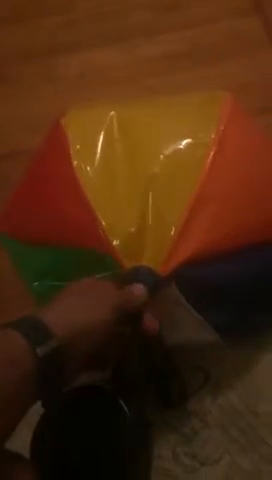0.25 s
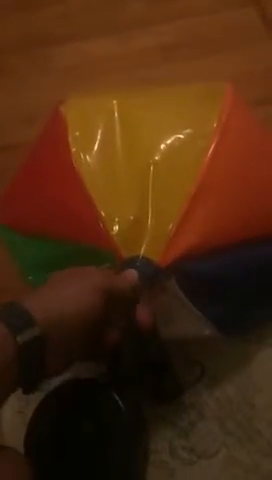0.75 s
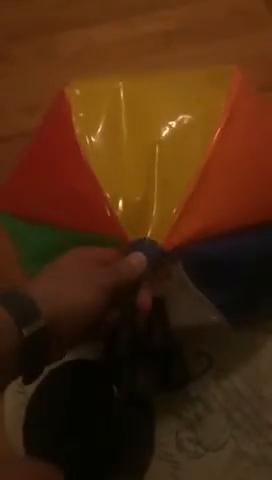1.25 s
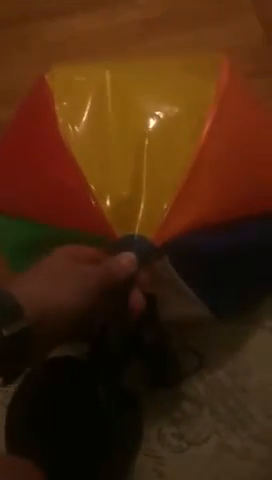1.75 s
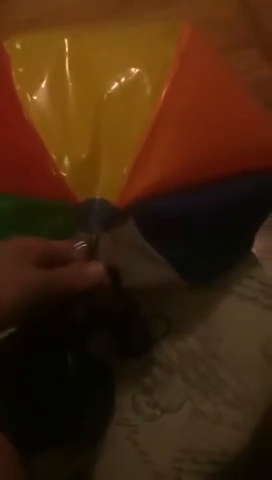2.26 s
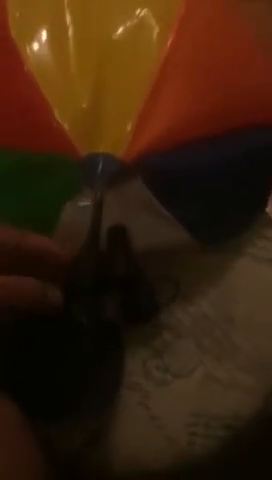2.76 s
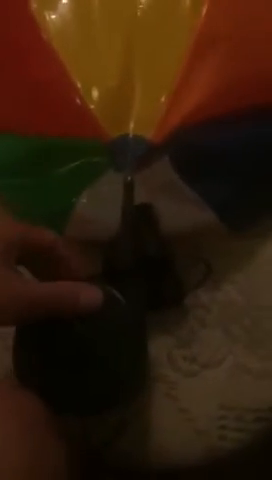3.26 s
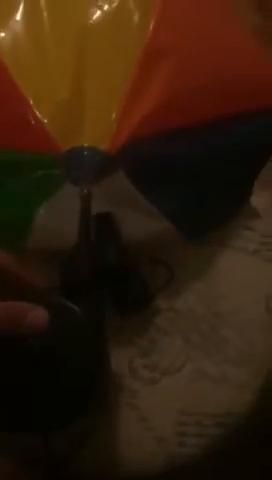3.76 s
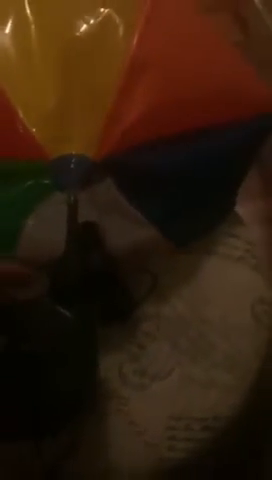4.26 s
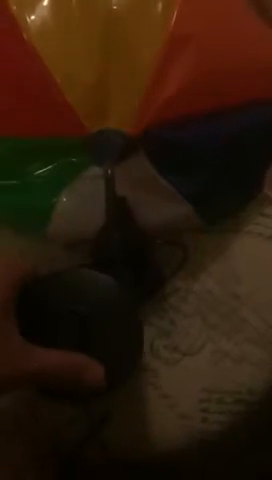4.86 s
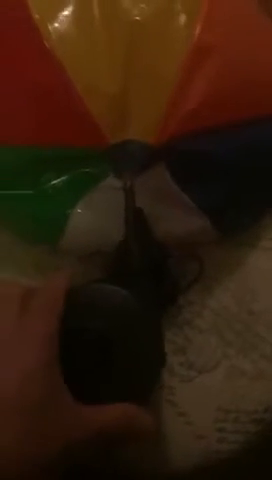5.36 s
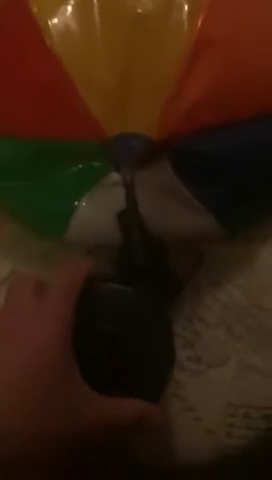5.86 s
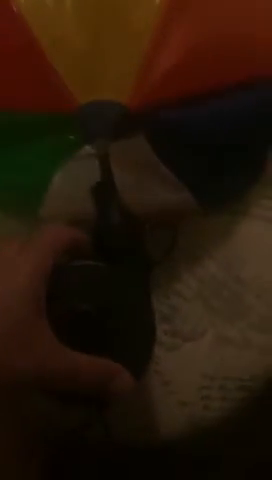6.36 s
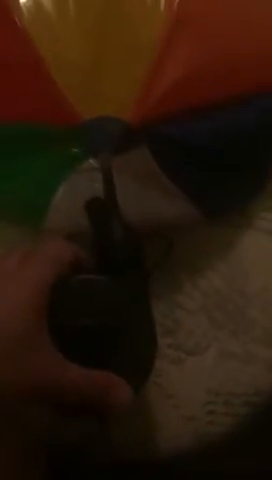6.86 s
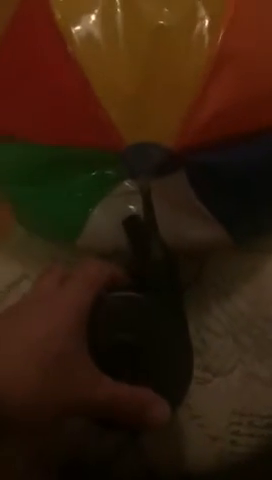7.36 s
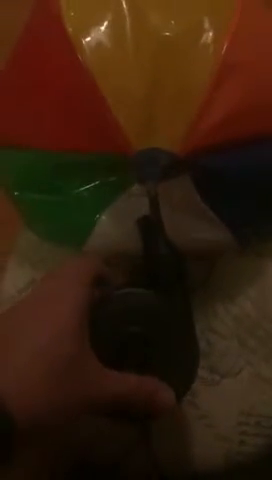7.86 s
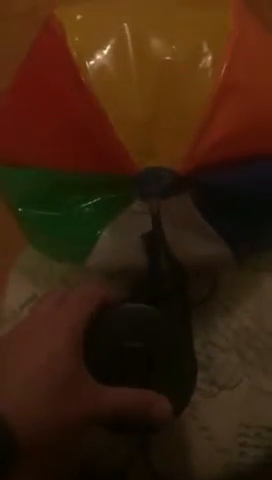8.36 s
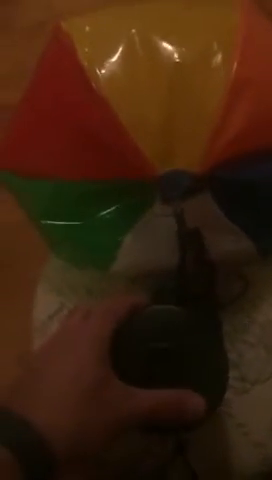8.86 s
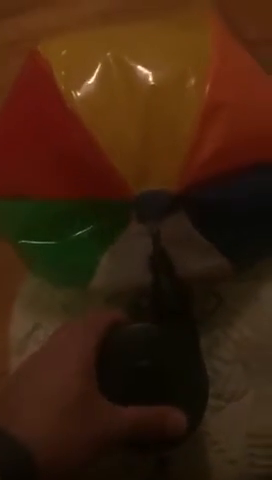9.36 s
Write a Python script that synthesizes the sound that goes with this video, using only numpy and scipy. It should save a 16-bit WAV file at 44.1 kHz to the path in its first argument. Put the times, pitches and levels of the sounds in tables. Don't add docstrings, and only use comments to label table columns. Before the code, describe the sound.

A handheld electric inflater runs indoors, close and dry: broad airy hiss, motor hum and a shrill steady fan tone. The sound shifts slightly as the hand moves, and low puffs buffet the microphone. The power goes off and the whine glides downward over about two seconds into a low floor rumble and quiet. A small switch creak follows, then a loud click and a quickly rising whirr.

```python
import sys
import numpy as np
from scipy import signal
from scipy.fft import rfft, irfft, next_fast_len
from scipy.io import wavfile
from scipy.ndimage import uniform_filter1d

SR = 44100
rng = np.random.default_rng(int(sys.argv[2]) if len(sys.argv) > 2 else 0)


def persist_wave(psi):
    counts = np.round(np.clip(psi, -1, 1) * 32767).astype(np.int16)
    wavfile.write(sys.argv[1], SR, np.atleast_2d(counts).T)


def magnitude_from_level(level_db):
    exponent = np.asarray(level_db, float) / 20
    return 10 ** exponent


N = 423801

# pitch_hz, density_db (per Hz)
ROOM_COLOUR = [(24, -29.5), (40, -5.5), (87, -9), (177, -11), (273, -7), (327, -15.5), (1510, -16),
               (7830, -25), (9400, -24.5), (12200, -51), (20700, -120)]
ROOM_DB = -70.5

# start_s, pitch_hz, level_db
VALVE_SIGH = [
    (8.15, 379, -85),
    (8.22, 374, -56),
    (8.4, 338, -59),
    (8.5, 340, -59),
    (8.55, 344, -93),
]

# start_s, peak_db
SWITCH_CONTACTS = [(9.167, -55), (9.174, -57), (9.182, -59), (9.337, -56), (9.349, -53), (9.361, -24),
                   (9.3613, -3), (9.3629, -13), (9.3644, -19), (9.368, -28), (9.381, -34)]
# pitch_hz, level_db, t60_s
SWITCH_MODES = [(1500, -13, .035), (3700, -11, .02), (4100, -1, .004), (6500, -5, .003), (4700, -16, .022),
                (5450, -22, .045), (6380, -18, .03), (6870, -14, .012), (7850, -25, .02)]

OFF_S, ON_S = 6.757, 9.361
FULL_HZ = 357
DRAG_PER_S, FRICTION_HZ = 0.82, 29.15
RUN_UP_S, RUN_UP_POWER = .362, .82
STALL_HZ, STALL_SOFT_HZ = 68, 2.9

# peak_s, peak_db, fall_s
OUTFLOW_GUSTS = [(.06, -62.5, 0.096), (1.2, -41.5, 0.043), (1.48, -56, 0.032), (2.88, -62, 0.12),
                 (3.18, -67, .04), (3.54, -52, 0.072), (4.15, -57, .06), (4.5, -66.5, 0.051),
                 (5.55, -54.5, 0.069), (5.66, -52, 0.034), (5.8, -53, .05), (5.93, -60, 0.036),
                 (6.14, -41.5, 0.027), (6.25, -41, 0.04), (6.385, -37.5, 0.032), (6.51, -37, 0.047),
                 (6.69, -36.5, 0.018), (6.8, -41.5, 0.061), (6.97, -45.5, 0.031), (7.12, -34, 0.029),
                 (7.3, -48, 0.033), (7.39, -43, 0.022), (7.56, -47, 0.055), (8.0, -58, 0.15),
                 (8.3, -74, 0.062), (8.47, -70.5, 0.038), (8.81, -63, 0.043), (9.2, -76.5, .1)]
BUFFET_DB, BUFFET_POWER, GUST_RISE_SHARE = -59.5, .8, .7
# start_s, peak_db, pitch_hz
SINGLE_PUFFS = [(6.13, -25, 80), (6.19, -30, 90.2), (6.221, -26, 140), (6.233, -23, 86.4),
                (6.352, -27, 110), (6.366, -30, 100), (6.387, -16.5, 104.7), (6.389, -23.5, 211),
                (6.43, -30, 110), (6.497, -22, 121), (6.521, -25, 95), (6.67, -31, 88.6), (6.771, -24, 70),
                (6.791, -16, 125), (6.868, -30, 75), (6.799, -19, 240), (6.948, -27, 129.8),
                (6.961, -30, 87.4), (7.014, -35, 80), (7.093, -25, 100), (7.116, -29, 80),
                (9.166, -54, 230.5), (9.167, -50.5, 590), (1.2, -41, 80.6), (3.53, -49, 70),
                (5.655, -42, 70.6), (9.21, -52, 74.6), (9.354, -30, 190), (9.361, -40, 364)]

HUM_DB, INRUSH_DB, INRUSH_FALL_DB_PER_S = -67, -42, 98
# middle_s, half_length_s, level_db
FLOOR_CONTACT = (1.85, .16, -61)

# start_s, shaft_tone_db, ninth_order_db
SHAFT_TONES = [(0, -36, -39.5), (.6, -37.5, -38.5), (1.7, -31.5, -35.5), (2.6, -35, -37), (3.7, -35.5, -55),
               (4.6, -33.5, -33), (5.4, -32.5, -33.5), (6.3, -38.5, -41.5), (6.76, -37.5, -34)]
# start_s, blade_tone_hz, blade_tone_db
BLADE_TONE = [(0.0, 5348, -25), (0.88, 5355, -22), (0.98, 5357, -25), (2.08, 5352, -23), (2.16, 5351, -30),
              (2.23, 5352, -24), (2.52, 5353, -35), (2.68, 5354, -26), (3.13, 5353, -19), (3.45, 5355, -25),
              (4.05, 5358, -24), (4.41, 5358, -28), (4.47, 5357, -22), (5.13, 5359, -28), (5.27, 5356, -24),
              (5.69, 5353, -27), (5.76, 5354, -23), (6.74, 5351, -23)]
# shaft_multiple (ratio), mains_offset_hz, level_db
MAGNETIC_ORDERS = [(2, 0, -38), (4, 0, -39.5), (4, 120, -45), (6, 0, -39), (7, -120, -49), (7, 0, -45.5),
                   (8, -120, -46), (8, 0, -42.5), (9, -120, -47), (10, 0, -48), (10, 120, -48),
                   (12, 0, -48.5)]
DRIVE_START_DB = -8
SHAKE_DB, SHAKE_POWER = -49.5, 1.7
# pitch_hz, width_hz, level_db
FLOORBOARDS = [(58.2, 30, -29), (84, 8.4, 7.5), (96.5, 10, 5.5), (112.4, 10, 5.5), (171.2, 66, 18.5),
               (219, 26, 11), (306.5, 61, -17)]
START_GRIP_DB = -4
# pitch_hz, level_db
OUTLET_PASS = [(1200, -120), (2300, -83), (2750, -33.5), (3050, -63), (3450, -58), (3650, -40),
               (3800, -43.5), (3950, -25.5), (4250, -27), (4590, -22.5), (4830, -39), (5345, -16.5)]
# pitch_hz, half_width_hz, level_db
OUTLET_RESONANCES = [(4200, 300, -0.5), (5150, 165, -6)]
# shaft_multiple (ratio), resonance (index above), level_db
BLADE_OVERTONES = [(30, 0, 1), (36, 0, -14), (48, 0, -1), (55, 0, -5), (62, 0, 0), (69, 0, -7), (50, 1, 1),
                   (59, 1, 5), (66, 1, 3)]
# shaft_hz, level_db
COASTING_WHINE = [(35, -92), (50, -76), (70, -63), (95, -60), (130, -80)]
WHINE_START_DB = 8

# pitch_hz, width_hz, level_db
SLOW_AIR_RESONANCES = [(350, 220, -17), (585, 170, -6.5), (800, 200, -9), (1090, 340, -5), (2680, 140, -19),
                       (4250, 300, -17.5), (5070, 100, -28), (6600, 300, -31.5), (7400, 1400, -38)]
# shaft_hz, level_db
SLOW_AIR_LEVEL = [(28, -84), (46, -68.5), (62, -54), (85, -44), (115, -41.5), (165, -90.5)]

# start_s, level_db, leak_db (past the valve)
NOZZLE_FLOW = [(0, -.5, 0.5), (.55, 0, 1), (1.1, 0.5, -0.5), (1.6, -0.5, 0.5), (2.1, 0, 1), (2.6, 1, 1),
               (2.95, 1, 2), (3.3, 0, 0), (3.7, 1, -1.5), (4.2, 0, -3.5), (4.6, 0.5, -2), (5.1, 1, -1.5),
               (5.6, 0, -1.5), (6.1, 1.5, -3.5), (6.5, 0.5, -3), (6.76, 1.5, -3)]
BAND_CENTRES_HZ = (500, 1200, 2200, 3900, 5700)
BAND_STEADY_DB = (-30, -25, -15, -37.5, -32.5)
BAND_FLOW_POWERS = (1.4, 0.92, 1.24, 1.46, 1.96)
BAND_LEAK_SHARES = (-0.13, 0.28, 0.71, -1.1, 0.28)
BRUSH_SCRAPE_DB = (-51, -49, -41, -55, -58)
# pitch_hz, density_db (per Hz)
AIR_SPECTRUM = [(59, -50.5), (100, -35), (187, -20.5), (357, -4), (416, -4.5), (609, -2), (764, -3.5),
                (1570, 3.5), (2390, -11), (4480, -8), (4930, -9.5), (5520, -6.5), (5840, -6.5), (8710, -14),
                (9400, -20.5), (12200, -56), (20700, -120)]
# pitch_hz, width_hz, level_db
HOUSING_RESONANCES = [(263.3, 77, 7.5), (410, 79, -6), (550, 69, 8), (616, 28, 7.5), (1653, 580, -5),
                      (2302, 38, 7), (2741, 280, 9), (4640, 450, 3.5), (4820, 200, -10.5)]
GRIP_CHANGES_S, REGRIP_S = (2.35, 4.35), 0.14
# pitch_hz, width_hz, first_hold_db, second_hold_db, third_hold_db
HOLD_REFLECTIONS = [(1500, 260, 0, 1, -2), (1860, 120, -1.5, -1.5, -0.9), (2180, 130, -1, -3, -0.8),
                    (2450, 90, 2, -1, -3.5), (2750, 170, 0.3, -0.1, -3), (2950, 100, -1, 0.5, -5),
                    (3335, 150, 0, -2.5, -1), (3680, 100, -1, -4, -0.5), (3870, 140, 1.2, -0.5, -5.5),
                    (4800, 220, -2, -2, 4), (6250, 500, -4, -0.1, -1.2), (6970, 170, -1, 0.6, 3.5),
                    (7770, 740, -6.5, -4, 1.1), (8170, 270, -4.5, -1.5, -7), (8730, 510, 2.5, 2.5, 0.5)]

# pitch_hz, depth_db
MASKING_DEPTH = [(100, 26), (1500, 17), (1900, 10.5), (4500, 8.5), (4900, 3), (5300, 8), (5900, 7.5),
                 (6900, 7), (7300, 1.5), (8700, 2), (9050, -.5), (9400, -12)]


def rms_one(x):
    return x / np.sqrt(np.mean(x ** 2) + 1e-20)


def in_time(rows):
    s, *columns = np.transpose(rows)
    return [np.interp(np.arange(N) / SR, s, c) for c in columns]


def at_hz(points, hz):
    pitch_hz, level_db = np.transpose(points)
    return np.interp(np.log(hz), np.log(pitch_hz), level_db)


def resonance(hz, top_hz, width_hz):
    return 1 / (1 + (2 * (hz - top_hz) / width_hz) ** 2)


def drift(rate):
    r = np.exp(-80 * np.pi * rate / SR)
    slow = signal.lfilter([1], [1, -2 * r, r * r], rng.standard_normal(N // 40 + 2002))[2000:]
    return np.interp(np.arange(N) / 40, np.arange(len(slow)), rms_one(slow))


def ring(clicks, hz, t60):
    r, w = magnitude_from_level(-60 / (t60 * SR)), 2 * np.pi * hz / SR
    return signal.lfilter([0, np.sin(w)], [1, -2 * r * np.cos(w), r * r], clicks + 1e-18)


def tone(turns, level_db):
    return np.sqrt(2) * magnitude_from_level(level_db) * np.sin(2 * np.pi * (turns + rng.random()))


def band_pass(x, low_hz, high_hz):
    return signal.sosfilt(signal.butter(2, [low_hz, high_hz], "band", fs=SR, output="sos"), x)


def coloured(level_db):
    size = next_fast_len(N)
    hz = np.maximum(np.fft.rfftfreq(size, 1 / SR), 1)
    return rfft(rng.standard_normal(size)) * magnitude_from_level(level_db(hz)), hz


def room_floor():
    spectrum, _ = coloured(lambda hz: at_hz(ROOM_COLOUR, hz))
    return magnitude_from_level(ROOM_DB) * rms_one(irfft(spectrum)[:N])


def valve():
    hz, level_db = in_time(VALVE_SIGH)
    return tone(np.cumsum(hz + 6 * drift(3.6)) / SR, level_db + 0.92 * drift(15))


def switch():
    start_s, peak_db = np.transpose(SWITCH_CONTACTS)
    at = np.round(start_s * SR).astype(int)
    out = np.zeros(N)
    for k, (hz, level_db, t60) in enumerate(SWITCH_MODES):
        strikes = np.zeros(N)
        strikes[at] = magnitude_from_level(peak_db + level_db + rng.normal(0, 1, len(at)))
        out += (-1) ** k * ring(strikes, hz, t60)
    clicks = np.zeros(N)
    clicks[at] = magnitude_from_level(peak_db)
    crack = magnitude_from_level(-13) * signal.lfilter([1], [1, -magnitude_from_level(-60 / (.022 * SR))], clicks + 1e-18)
    tail = magnitude_from_level(-32.0) * signal.lfilter([1], [1, -magnitude_from_level(-60 / (.25 * SR))], clicks + 1e-18)
    return out + band_pass((crack + tail) * rng.standard_normal(N), 2600, 7500)


def shaft():
    t = np.arange(N) / SR
    powered_hz = in_time(BLADE_TONE)[0] / 15.0
    coasting = (powered_hz + FRICTION_HZ) * np.exp(-DRAG_PER_S * np.maximum(t - OFF_S, 0)) - FRICTION_HZ
    starting = FULL_HZ * (1 - np.exp(-(np.maximum(t - ON_S, 0) / RUN_UP_S) ** RUN_UP_POWER))
    return np.maximum(np.maximum(coasting, starting), 1)


def flow_db(shaft_hz):
    above = STALL_SOFT_HZ * np.logaddexp(0, (shaft_hz - STALL_HZ) / STALL_SOFT_HZ)
    return 20 * np.log10(above / (FULL_HZ - STALL_HZ))


def gusts(shaft_hz):
    t = np.arange(0, N, 64) / SR
    swell = np.zeros(len(t))
    for peak_s, peak_db, fall_s in OUTFLOW_GUSTS:
        time_constant = fall_s * np.where(t < peak_s, GUST_RISE_SHARE, 1)
        swell += magnitude_from_level(peak_db) * np.exp(-np.abs(t - peak_s) / time_constant)
    steady = magnitude_from_level(BUFFET_DB + BUFFET_POWER * flow_db(shaft_hz))
    return steady + np.interp(np.arange(N) / SR, t, swell)


def buffeting(shaft_hz, lumpy_db, low_hz, high_hz):
    rumble = band_pass(rng.standard_normal(N), low_hz, high_hz)
    out = gusts(shaft_hz) * rms_one(rumble * magnitude_from_level(lumpy_db * drift(24)))
    for s, peak_db, hz in SINGLE_PUFFS:
        cycles = np.arange(round(4 * SR / hz)) * hz / SR
        at = round(s * SR)
        swing = cycles * np.exp(-1.6 * cycles) * np.sin(2 * np.pi * cycles)
        out[at:at + len(cycles)] += magnitude_from_level(peak_db + 8) * swing
    return out


def hum_db(t):
    middle, half, contact_db = FLOOR_CONTACT
    running = magnitude_from_level(HUM_DB) + magnitude_from_level(contact_db) * np.exp(-((t - middle) / half) ** 2 / 2)
    surge = magnitude_from_level(np.maximum(INRUSH_DB - INRUSH_FALL_DB_PER_S * (t - ON_S), HUM_DB + 16.0))
    return 20 * np.log10(running * (t < OFF_S) + surge * np.clip((t - ON_S) * 100, 0, 1) + 1e-6)


def overtones(shaft_hz, turns, whine_db):
    seconds = np.arange(N) / SR
    whine_db = np.maximum(whine_db, np.where(seconds < ON_S, at_hz(COASTING_WHINE, shaft_hz), -200))
    surge_db = WHINE_START_DB * (seconds > ON_S)
    out = 0
    for multiple, which, level_db in BLADE_OVERTONES:
        top, half, db = OUTLET_RESONANCES[which]
        near = magnitude_from_level(db + level_db) * resonance(multiple * shaft_hz, top, 2 * half) ** 2
        blurred = multiple * turns + np.cumsum(12 * drift(40)) / SR
        gain_db = surge_db * (1 + (multiple == 36)) * (multiple < 50)
        out = out + tone(blurred, whine_db + gain_db + 3 * drift(40)) * near
    return out


def motor(shaft_hz, middle_db, wobble_hz, waver_db, overtone_db):
    seconds = np.arange(N) / SR
    powered = np.clip((OFF_S - seconds) * 25 + 1, 0, 1)
    grip_db = START_GRIP_DB * (seconds > ON_S)
    speed_db = 20 * np.log10(shaft_hz / FULL_HZ)
    turns = np.cumsum(shaft_hz + wobble_hz * drift(14)) / SR

    boards_db = sum(db * resonance(shaft_hz, top, width) for top, width, db in FLOORBOARDS)
    shake_db = SHAKE_DB + SHAKE_POWER * (speed_db + 8.0) + boards_db
    shaft_db, ninth_db = in_time(SHAFT_TONES)
    unbalance_db = powered * shaft_db + (1 - powered) * shake_db
    out = tone(turns, unbalance_db + grip_db + waver_db * drift(23))
    out += tone(9 * turns, ninth_db + 14 * speed_db - 12 * (1 - powered) + .8 * drift(6))

    blade_db = powered * in_time(BLADE_TONE)[1] + (1 - powered) * at_hz(OUTLET_PASS, 15 * shaft_hz)
    out += tone(15 * turns, blade_db + 2 * grip_db + waver_db * drift(12))

    drive_db = 2 * speed_db + np.where(seconds > ON_S, DRIVE_START_DB, 40 * (powered - 1))
    for multiple, mains_hz, level_db in MAGNETIC_ORDERS:
        out += tone(multiple * turns + mains_hz * seconds, level_db + drive_db + 1.2 * waver_db * drift(2.6))
    out += overtones(shaft_hz, turns, middle_db + overtone_db)
    return out + tone(120 * seconds, hum_db(seconds))


def last_air(shaft_hz):
    spectrum, hz = coloured(np.zeros_like)
    shape = sum(magnitude_from_level(db) * resonance(hz, top, width) for top, width, db in SLOW_AIR_RESONANCES)
    before_restart = np.arange(N) < ON_S * SR
    return before_restart * magnitude_from_level(at_hz(SLOW_AIR_LEVEL, shaft_hz)) * rms_one(irfft(spectrum * shape)[:N])


def air_levels(shaft_hz):
    grip_db, leak_db = in_time(NOZZLE_FLOW)
    flow = flow_db(shaft_hz)
    started = np.arange(N) > ON_S * SR
    levels = []
    for steady_db, share, power, brush_db in zip(BAND_STEADY_DB, BAND_LEAK_SHARES, BAND_FLOW_POWERS, BRUSH_SCRAPE_DB):
        air_db = steady_db + grip_db + share * leak_db + power * flow
        levels.append(np.maximum(air_db, np.where(started, brush_db, -200)))
    return levels


def housing_db(hz):
    return at_hz(AIR_SPECTRUM, hz) + sum(db * resonance(hz, top, width) for top, width, db in HOUSING_RESONANCES)


def air(levels, patchy_db, trim_db):
    spectrum, hz = coloured(housing_db)
    steady = [np.mean(level[:6 * SR]) for level in levels]
    scale = 1 / np.std(irfft(spectrum * (hz > 800) * (hz < 1900))[:N])
    out, together = 0, drift(8.7)
    for centre in 90 * 2 ** np.arange(0, 7.1, .75):
        band = np.cos(np.pi * np.clip(np.log2(hz / centre) / 1.5, -.5, .5)) ** 2
        place = np.interp(np.log(centre), np.log(BAND_CENTRES_HZ), range(5))
        change_db = 0
        for k in range(5):
            change_db = change_db + max(1 - abs(place - k), 0) * (levels[k] - steady[k])
        flutter_db = patchy_db * (0.081 * together + drift(11))
        out = out + magnitude_from_level(change_db + flutter_db) * irfft(spectrum * band)[:N]
    return scale * magnitude_from_level(steady[1] + trim_db) * out


def past_hand(x):
    size = next_fast_len(N)
    spectrum, hz = rfft(x, size), np.fft.rfftfreq(size, 1 / SR)
    second, third = (np.clip((np.arange(N) / SR - s) / REGRIP_S + .5, 0, 1) for s in GRIP_CHANGES_S)
    out = 0
    for hold, share in enumerate((1 - second, second - third, third)):
        colour_db = sum(db[hold] * resonance(hz, top, width) for top, width, *db in HOLD_REFLECTIONS)
        out = out + share * irfft(spectrum * magnitude_from_level(colour_db), size)[:N]
    return out


def scene():
    shaft_hz = shaft()
    levels = air_levels(shaft_hz)
    mono = room_floor() + valve() + switch()
    mono += buffeting(shaft_hz, lumpy_db=5.0, low_hz=43.5, high_hz=126)
    mono += motor(shaft_hz, levels[3], wobble_hz=.12, waver_db=.8, overtone_db=5)
    mono += last_air(shaft_hz) + past_hand(air(levels, patchy_db=1.2, trim_db=0.81))
    return np.array([mono, mono])


def drop_masked_bands(x, spread_db, reach_db, jitter_db, size=1024, width=8, count=56, offset=84):
    n, k = np.arange(2 * size), np.arange(width * count)
    window = signal.windows.kaiser_bessel_derived(2 * size, 4 * np.pi)
    lead = 2 * size - offset
    basis = np.sqrt(2 / size) * window[:, None] * np.cos(np.pi / size * (n[:, None] + .5 + size / 2) * (k + .5))
    blocks = np.pad(x, (lead, 2 * size - (len(x) + lead) % size)).reshape(-1, size)
    lines = (np.hstack([blocks[:-1], blocks[1:]]) @ basis).reshape(-1, count, width)
    level_db = 10 * np.log10(np.mean(lines ** 2, axis=2) + 1e-20)
    centres_hz = (np.arange(count) + .5) * width * SR / 2 / size

    tonal = level_db > uniform_filter1d(level_db, 3, axis=1) + 5
    masker_db = level_db - 10 * tonal
    apart = np.abs(np.subtract.outer(np.arange(count), np.arange(count)))
    masking_db = np.max(masker_db[:, :, None] - np.minimum(spread_db * apart, reach_db), axis=1)

    lingering = signal.lfilter([.7], [1, -.72], rng.standard_normal((len(lines), count)), axis=0)
    luck = lingering + .4 * rng.standard_normal((len(lines), 1))
    jitter = jitter_db * luck * np.clip(centres_hz / 5500, .5, 1)
    needed_db = masking_db - at_hz(MASKING_DEPTH, centres_hz) + jitter

    step = magnitude_from_level(np.where(tonal, level_db - 12, needed_db + 9))[:, :, None]
    kept = step * np.trunc(lines / step + .4 * np.sign(lines))
    kept = kept + magnitude_from_level(-50) * lines * (centres_hz < 8900)[:, None]
    halves = (kept.reshape(len(lines), -1) @ basis.T).reshape(-1, 2, size)
    thinned = (halves[1:, 0] + halves[:-1, 1]).ravel()[lead - size:][:len(x)]

    power = uniform_filter1d(np.gradient(x) ** 2, size // 8) + 1e-12
    attack = power[size // 4:] / power[:-size // 4] > 200
    near = uniform_filter1d(np.pad(attack * 1., (size // 4, 0)), 2 * size) * size
    return thinned + (x - thinned) * np.clip(near, 0, 1)


def top_cut(x):
    return signal.sosfilt(signal.butter(12, 9660, fs=SR, output="sos"), x)


def record(dry):
    x = signal.sosfilt(signal.butter(2, 45, "high", fs=SR, output="sos"), dry[0])
    x = signal.sosfilt(signal.cheby2(8, 60, 11645, fs=SR, output="sos"), x)
    x = drop_masked_bands(x, spread_db=4.2, reach_db=28, jitter_db=4.6)
    return top_cut(np.array([x, x]))


dry = scene()
out = record(dry)
persist_wave(out)
```